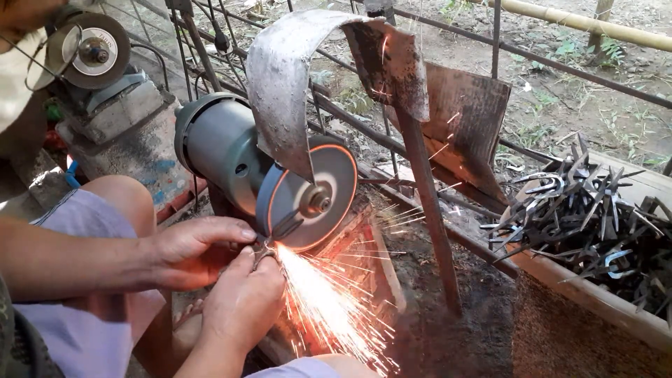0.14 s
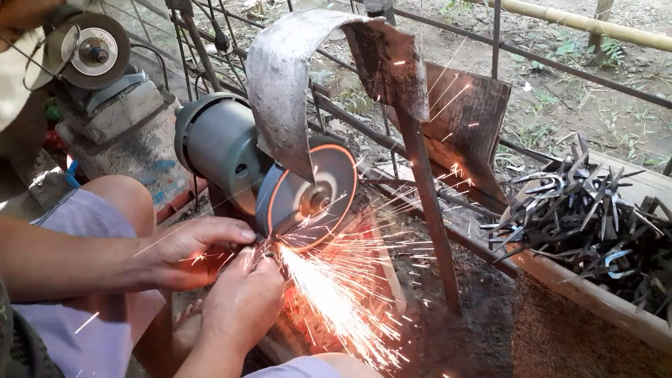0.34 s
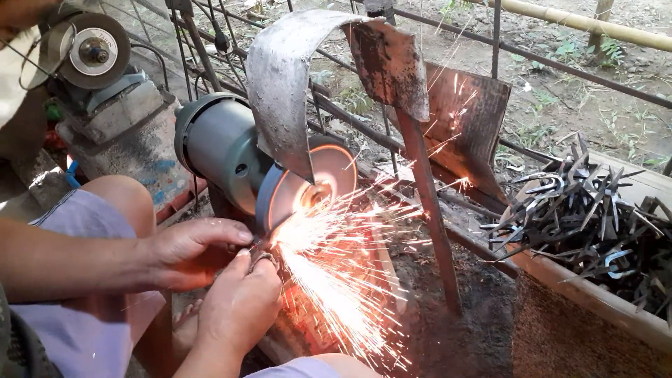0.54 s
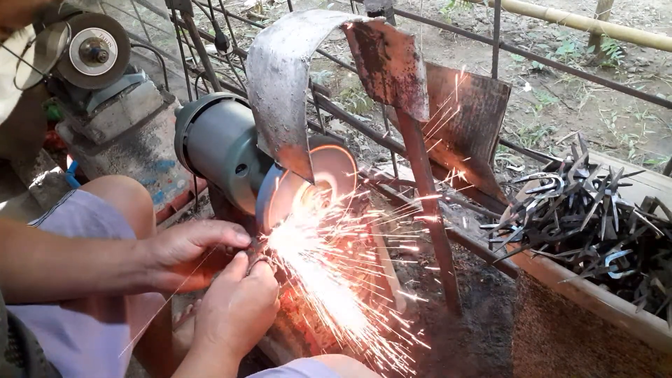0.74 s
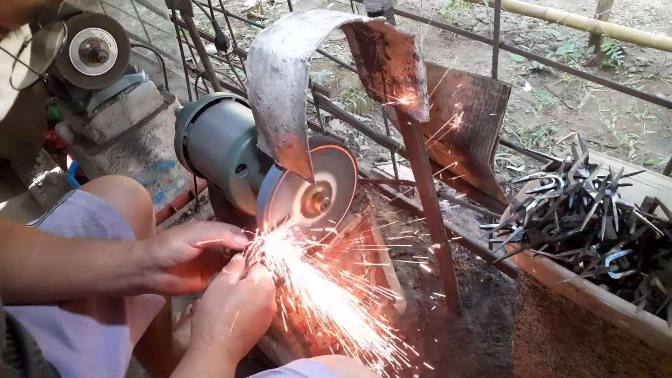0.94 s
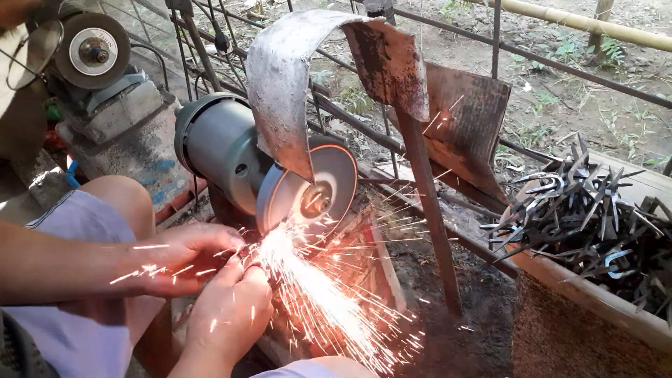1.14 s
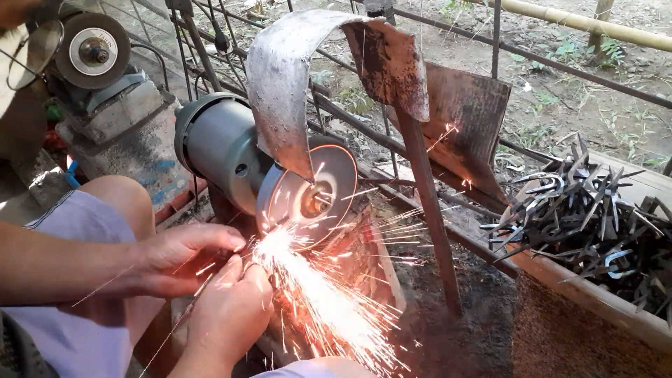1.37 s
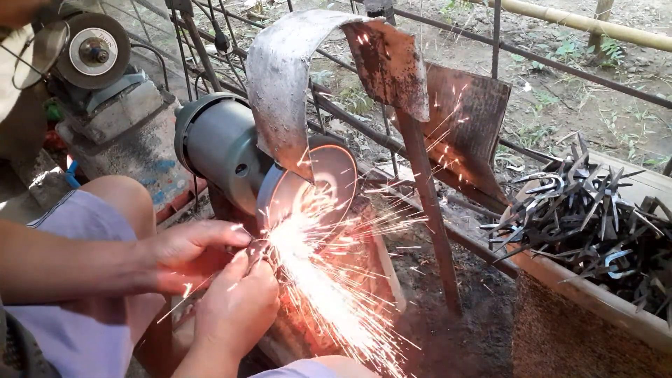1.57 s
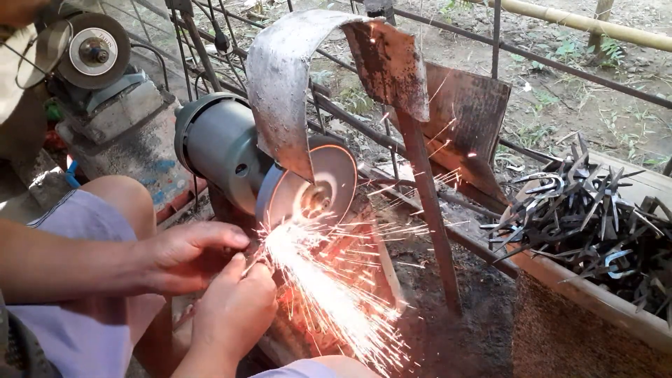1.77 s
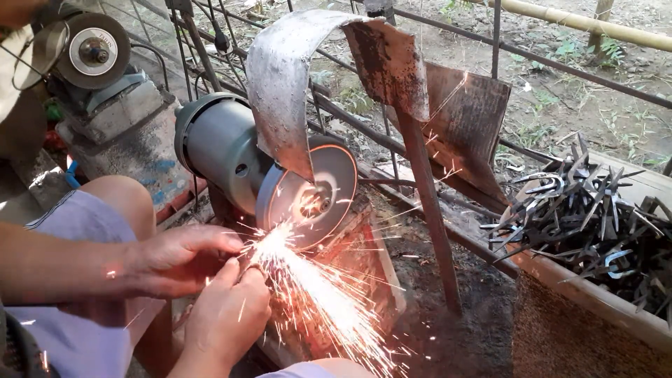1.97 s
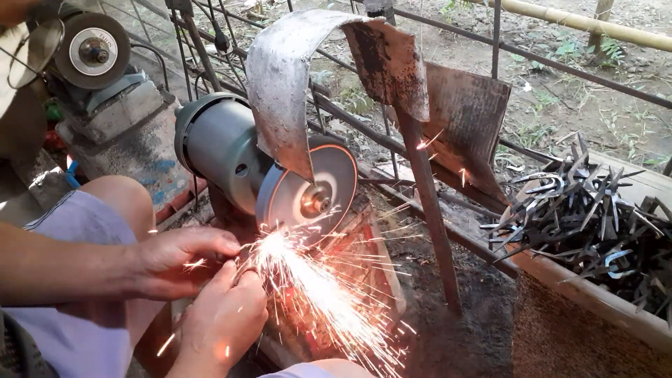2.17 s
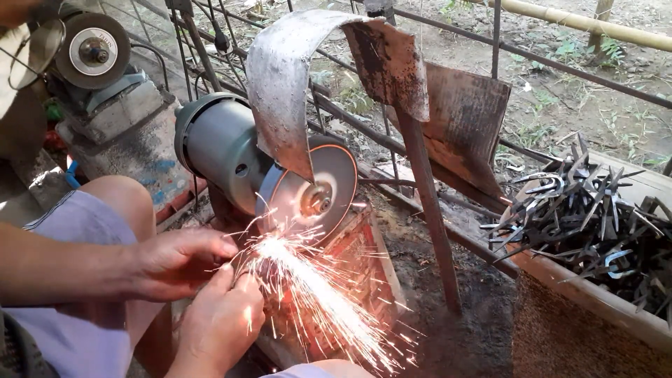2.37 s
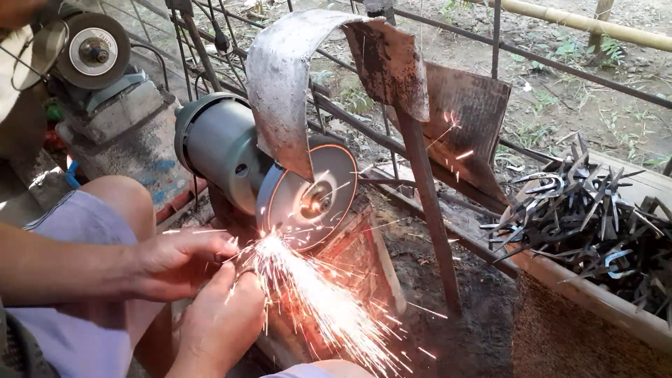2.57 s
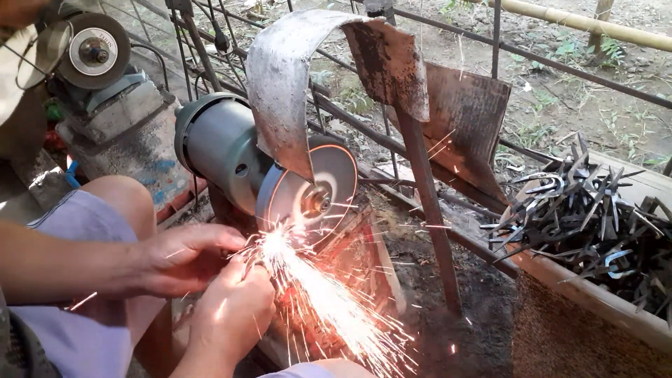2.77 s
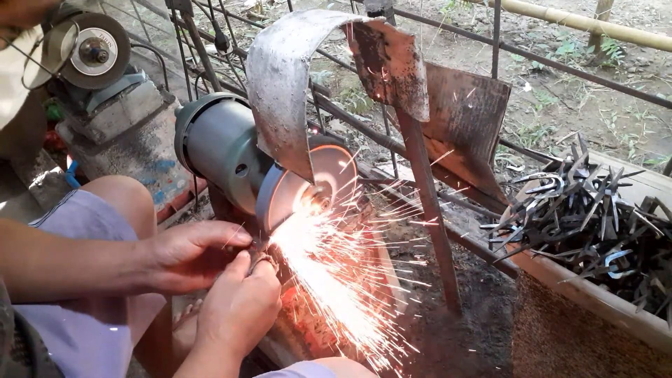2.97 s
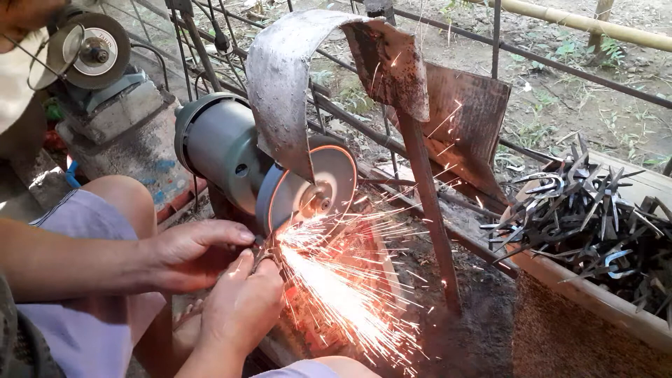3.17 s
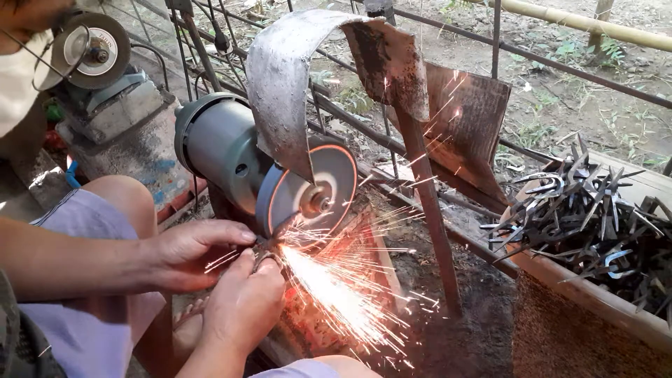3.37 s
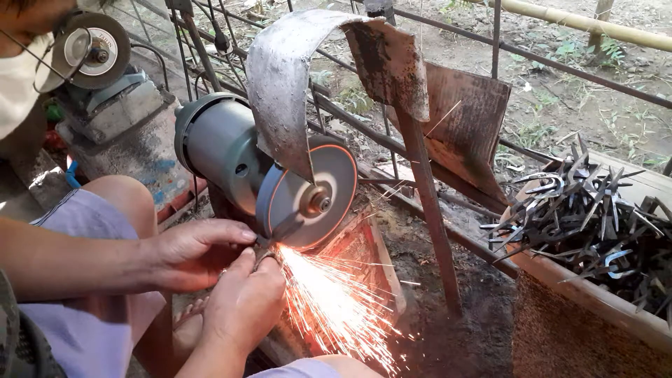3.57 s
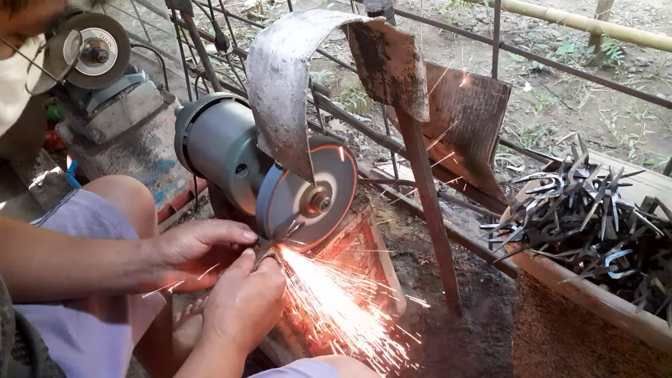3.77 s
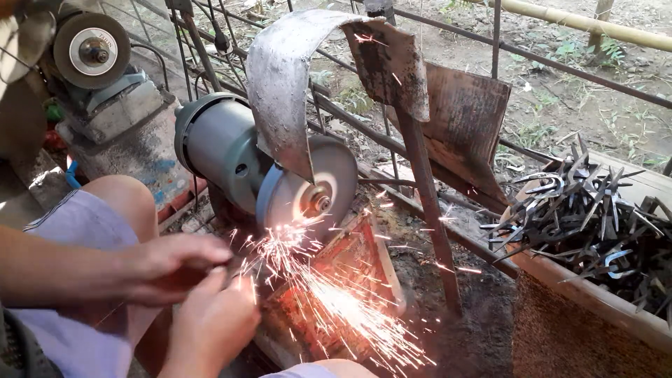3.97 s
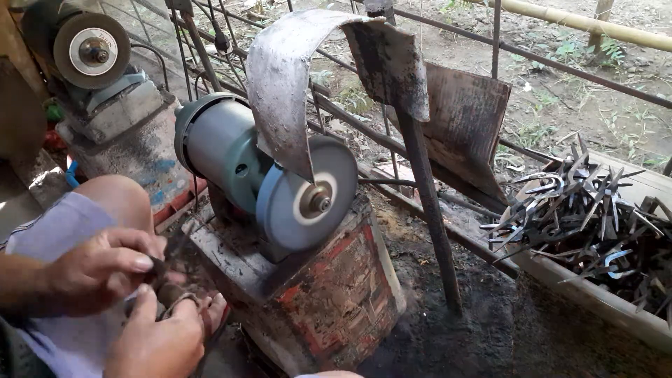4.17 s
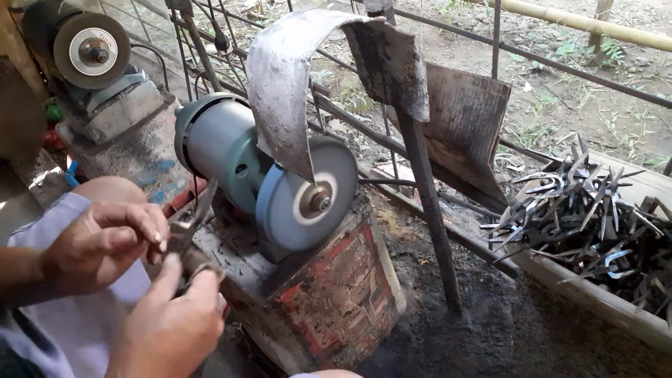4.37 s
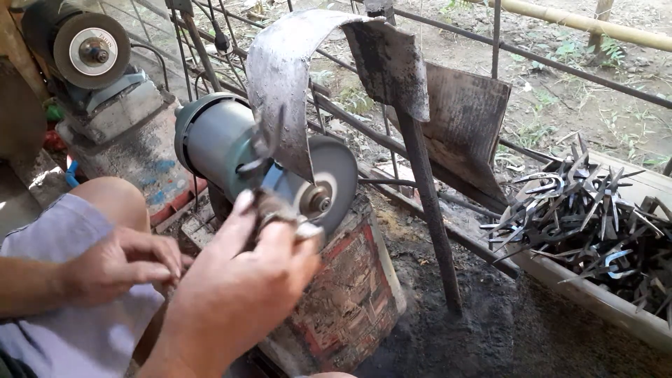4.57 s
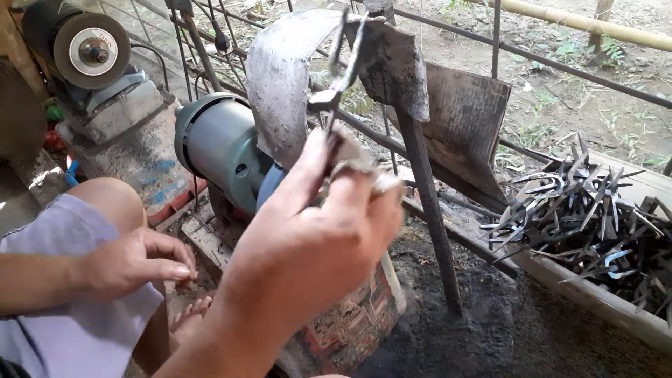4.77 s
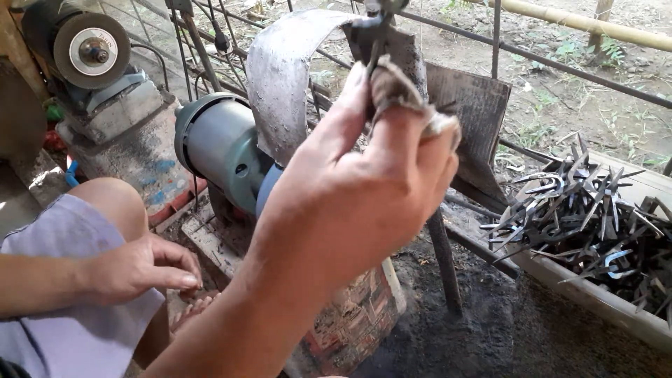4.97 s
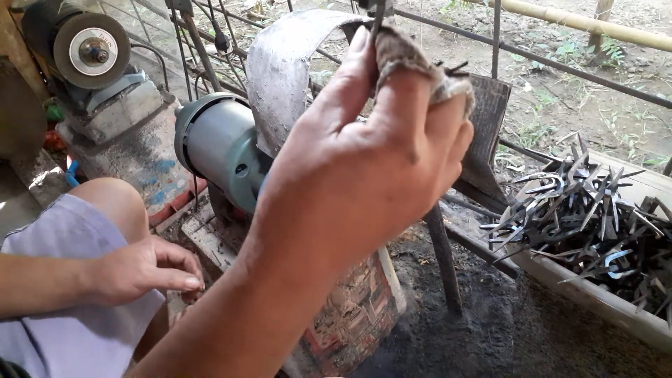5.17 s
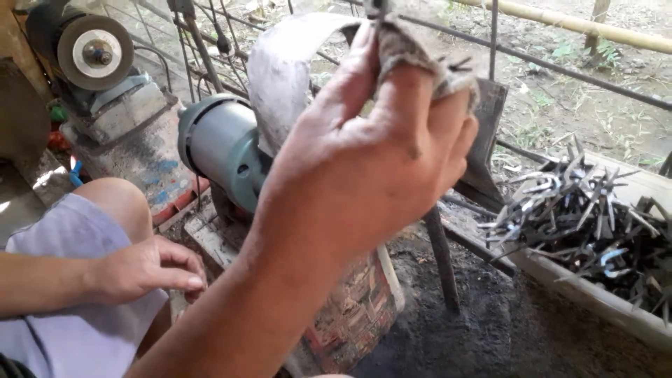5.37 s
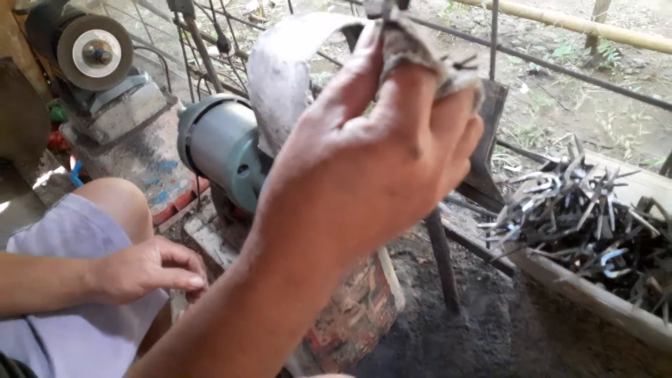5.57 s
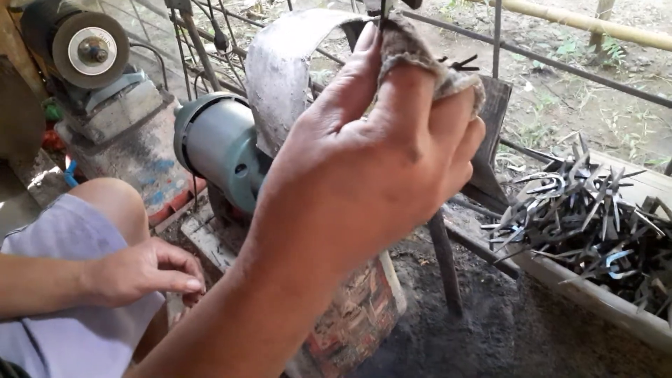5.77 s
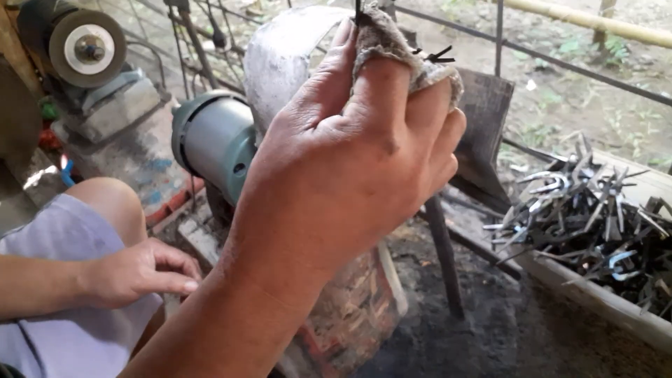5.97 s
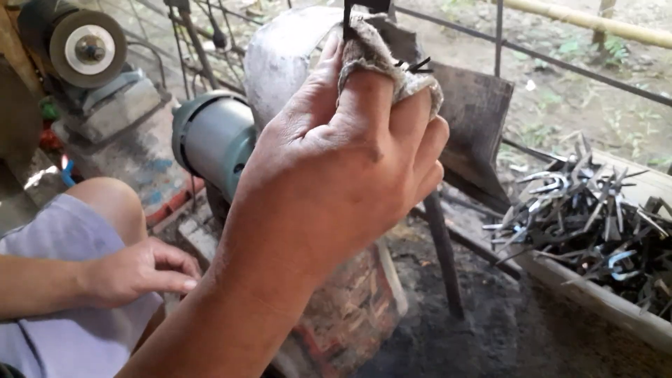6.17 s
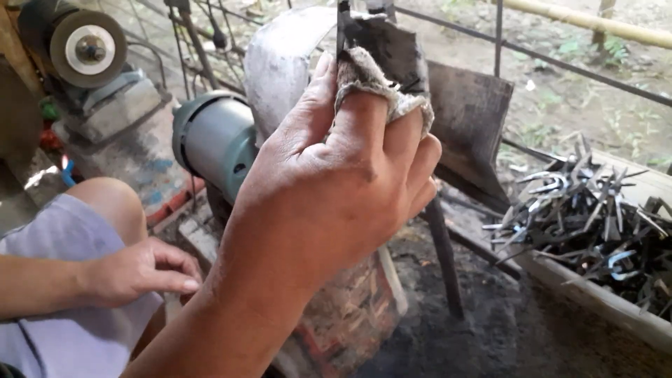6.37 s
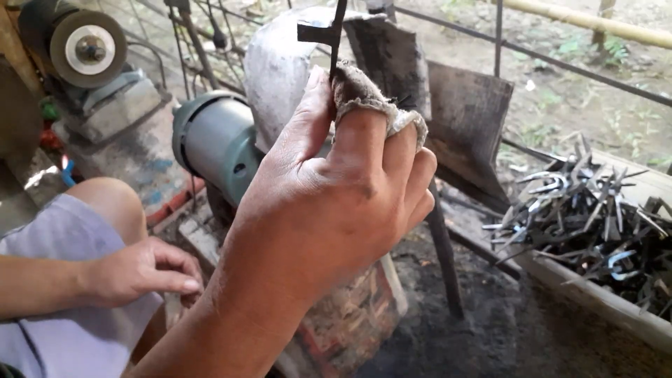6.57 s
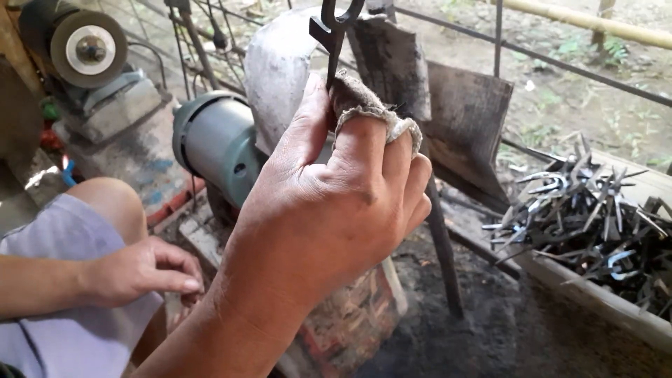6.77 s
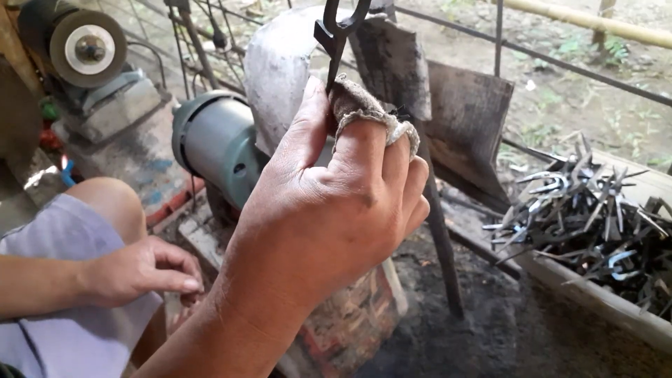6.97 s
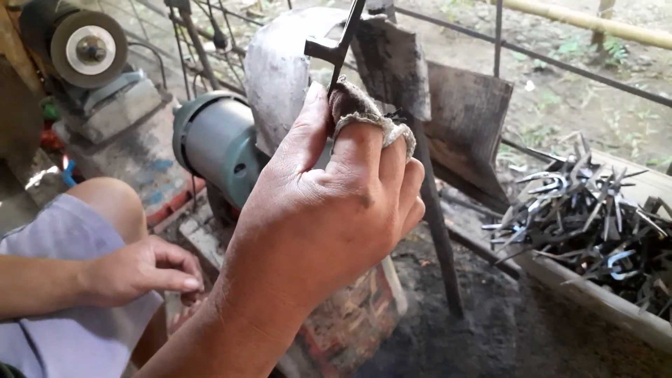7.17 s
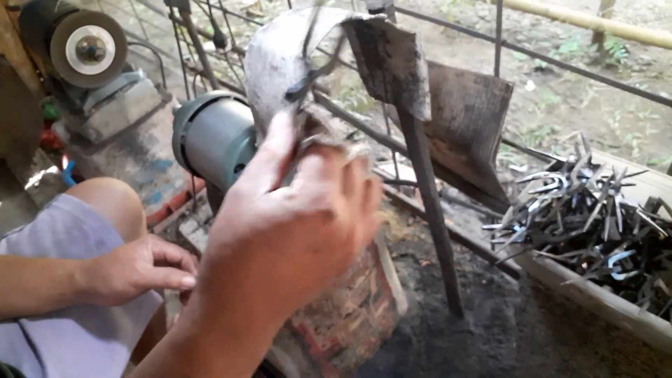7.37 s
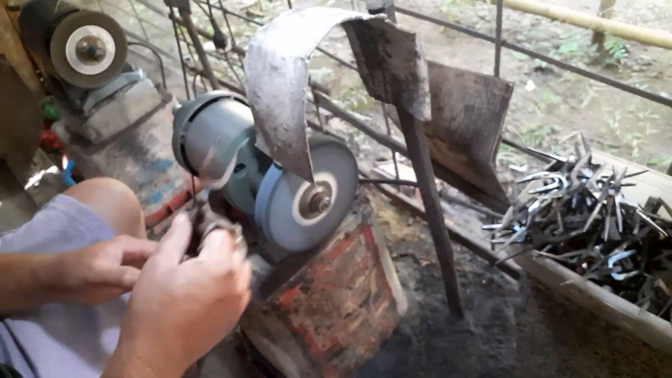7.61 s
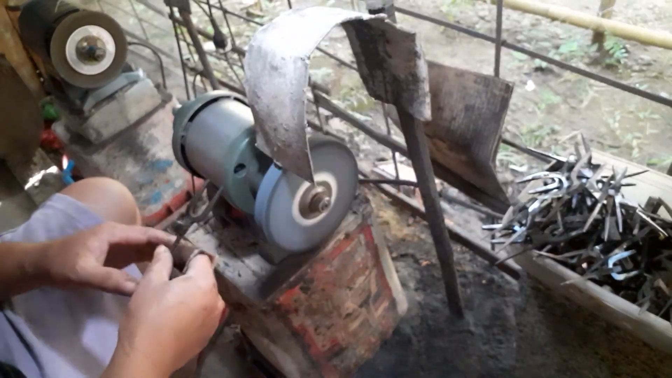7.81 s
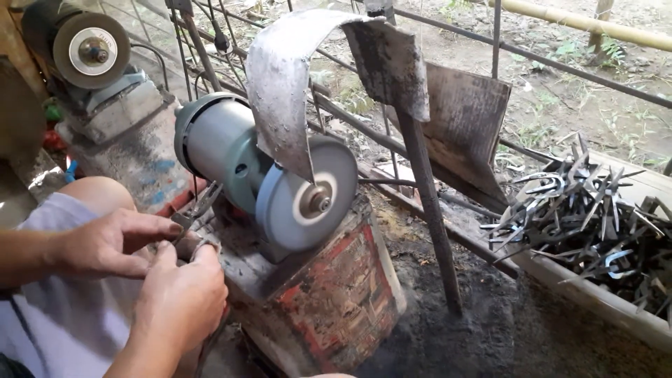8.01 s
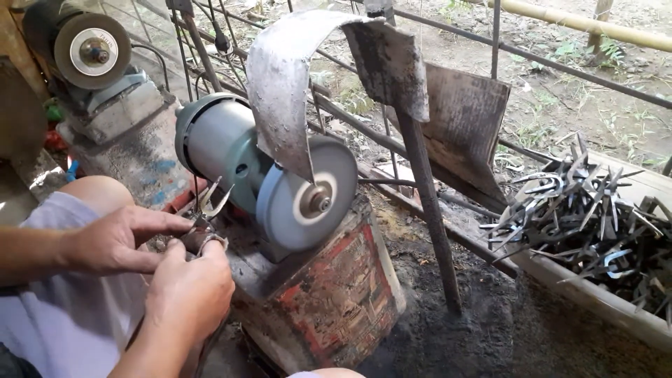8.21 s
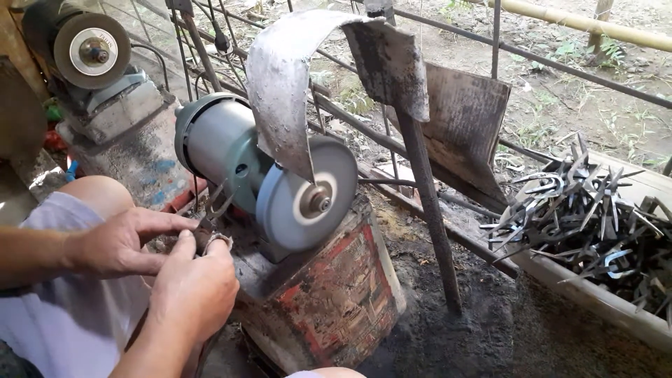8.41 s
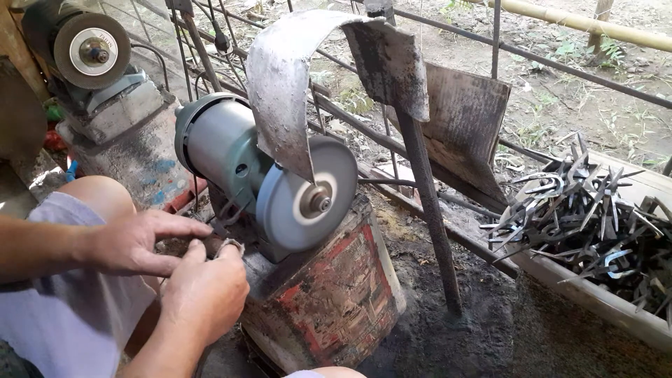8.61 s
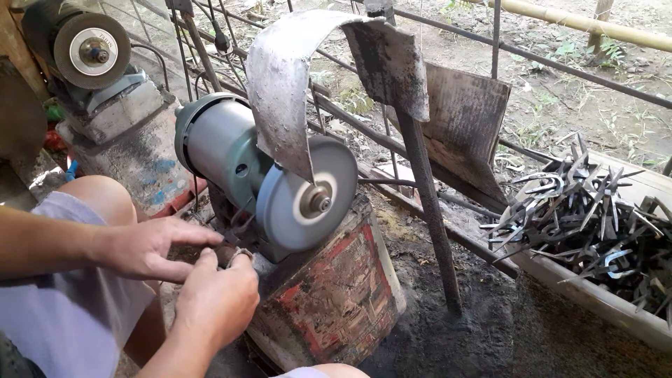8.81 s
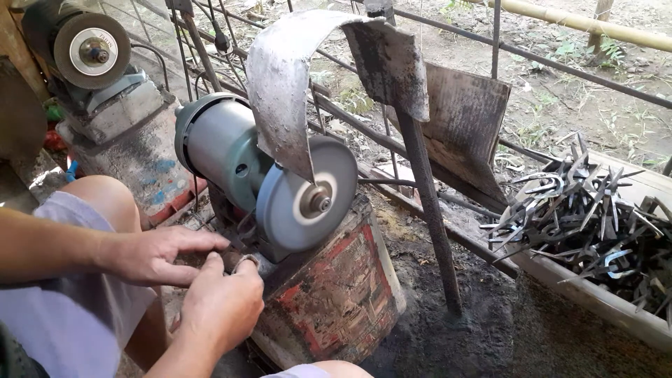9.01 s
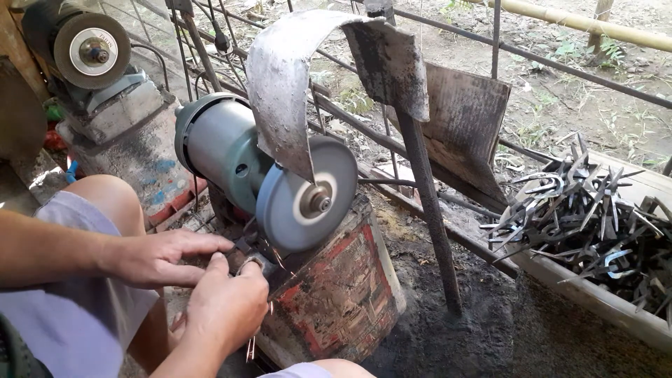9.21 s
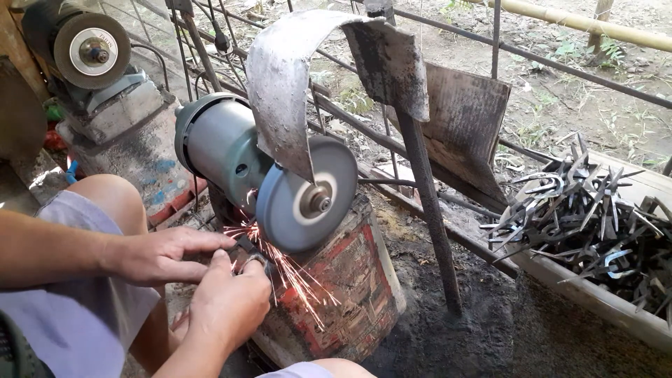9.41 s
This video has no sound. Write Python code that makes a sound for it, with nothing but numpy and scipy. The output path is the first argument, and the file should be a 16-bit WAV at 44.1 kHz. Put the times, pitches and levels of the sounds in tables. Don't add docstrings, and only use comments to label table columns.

```python
import sys
import numpy as np
from scipy import signal
from scipy.fft import rfft, irfft, next_fast_len
from scipy.io import wavfile
from scipy.ndimage import uniform_filter1d, map_coordinates

SR = 44100
rng = np.random.default_rng(int(sys.argv[2]) if len(sys.argv) > 2 else 0)


def put_to_file(sound):
    columns = np.atleast_2d(sound).T
    safe = np.clip(columns, -1, 1)
    whole_steps = np.round(safe * 32767)
    wavfile.write(sys.argv[1], SR, whole_steps.astype(np.int16))


def to_linear_factor(level_db):
    exponent = np.asarray(level_db, float) / 20
    return 10 ** exponent


N = 416743
TIME = np.arange(N) / SR
IDLE_HZ = 60.12
OFF_S = 4.04

# frequency in Hz, left minus right in dB.
IDLE_PAN = [(60, 5.5), (150, 3.5), (380, 6), (1500, -3), (2200, 4), (8300, 13), (10500, -12.5),
            (15000, 7.5)]


def level(x, db):
    return x * to_linear_factor(db) / np.sqrt(np.mean(x ** 2))


def curve(table):
    s, *columns = np.transpose(table)
    return [np.interp(TIME, s, c) for c in columns]


def walk(rate, db=None):
    held = np.repeat(rng.standard_normal(int(N / SR * rate) + 2), 4)
    knots = 1.2 * uniform_filter1d(held, size=4)
    knots = knots if db is None else to_linear_factor(db * knots)
    return np.interp(TIME * rate * 4, np.arange(len(knots)), knots)


def swells(rows):
    out = np.zeros(N)
    for s, length, strength in rows:
        span = slice(max(int((s - length / 2) * SR), 0), int((s + length / 2) * SR))
        out[span] += strength * np.cos(np.pi * (TIME[span] - s) / length) ** 2
    return out


def on_log(table, hz):
    f, v = np.transpose(table)
    return np.interp(np.log(hz + 1), np.log(f + 1), v)


def colour(x, spectrum, low_hz=0, high_hz=SR):
    size = next_fast_len(x.shape[-1])
    hz = np.fft.rfftfreq(size, 1 / SR)
    gain = to_linear_factor(on_log(spectrum, hz)) * (hz >= low_hz) * (hz < high_hz)
    return irfft(rfft(x, size) * gain, size)[..., :x.shape[-1]]


def ring(x, hz, width):
    return signal.lfilter(*signal.iirpeak(hz, hz / width, SR), x)


def rim(turns, kept, size=760):
    kept = np.clip(kept, 0, .99)
    fresh = rng.standard_normal((int(turns[-1]) + 2, size))
    worn = signal.lfilter([np.sqrt(1 - kept ** 2)], [1, -kept], fresh, axis=0)
    return map_coordinates(worn.ravel(), [turns * size], order=3)


def pair(phase, lead):
    phase = np.float32(phase % (2 * np.pi))
    return np.sqrt(2) * np.array([np.cos(phase), np.cos(phase - np.float32(lead))])


def ports(x, pan, phase=((1, 0),)):
    size = next_fast_len(x.shape[-1])
    hz = np.fft.rfftfreq(size, 1 / SR)
    side = to_linear_factor(on_log(pan, hz) / 2) * np.exp(.5j * on_log(phase, hz))
    both = np.array([side, 1 / side])
    both = both / np.maximum(np.abs(both.mean(axis=0)), .6)
    return irfft(rfft(x, size) * both, size)[:, :x.shape[-1]]


def hands():
    # time in seconds, pressure in dB, bracing against the rest from 0 to 1.
    stroke = [(0.0, 1, 0), (0.2, -1, 0), (0.38, -8.5, 0), (0.6, -1.5, 0.2), (0.9, 0, 0.2), (1.2, 0.5, 0.45),
              (1.5, -0.5, 0.06), (1.72, -4, 0.1), (1.87, 0.5, 0.18), (2.08, 2, 0.72), (2.35, 0, 0.96),
              (2.65, 0.5, 0.6), (2.9, -0.5, 0.15), (3.27, -7.5, 0), (3.55, 1.5, 0.05), (3.9, -1.5, 0.09)]
    # centre in seconds, length in seconds, strength from 0 to 1.
    leans = [
        (0.1, 0.32, 1),
        (2.46, 0.27, 1),
        (3.52, 0.47, 0.56),
        (3.75, 0.29, 0.89),
    ]
    # centre in seconds, length in seconds, strength from 0 to 1.
    flick = [
        (3.962, 0.067, 1),
    ]
    pressure, brace = curve(stroke)
    again = TIME > 6
    landing = 230 * np.minimum(TIME - 9.27, 0)
    lifting = -353 * np.maximum(TIME - 4.0, 0)
    fade = np.where(again, landing, lifting)
    fade = fade - 200 * ((TIME > OFF_S) & (TIME < 9.17))
    return np.where(again, 0, pressure), np.where(again, 0.65, brace), swells(leans), swells(flick), fade


def squeal():
    # centre in seconds, length in seconds, strength from 0 to 1.
    squeals = [(0.15, 0.6, 0), (0.65, 0.88, 0.23), (0.9, 0.31, 0.85), (1.62, 0.29, .25), (1.85, .25, 0.25),
               (2.95, .4, 0.1), (3.45, 0.28, 0.5), (9.33, 0.16, 0.27)]
    tone = np.cos(2 * np.pi * 2500 * TIME + 1.14 * walk(8.3)) * walk(18, db=-1.5)
    return tone * swells(squeals) * to_linear_factor(-25.5)


def wheel_bite(turns):
    # time in seconds, extra bite in dB.
    bounces = [(9.175, 1), (9.19, 1), (9.205, 21), (9.223, 10), (9.253, 13), (9.271, 15.5), (9.307, 9),
               (9.337, 11), (9.355, 3), (9.37, 13.5), (9.401, 1), (9.418, 5), (9.436, 8)]
    bite = 1.15 * np.cos(2 * np.pi * turns + 2.07 * walk(3))
    bite = bite - 5.3 * (TIME > 6)
    for s, db in bounces:
        start = int(s * SR)
        bite[start:] += db * np.exp(-TIME[:N - start] / 0.0036)
    return bite


def grinding(turns, hold):
    band_edges = (3700, 5600, 10200)
    grit_kept = (0.85, 0.7, 0.46, 0.074)
    # frequency in Hz, width in Hz, level in dB.
    blank_modes = [(1060, 260, -28), (1525, 80, -7), (1440, 100, -15), (1803, 23, -17), (2270, 30, -19),
                   (2650, 100, -18), (3180, 120, -25), (4170, 26, 5), (4100, 95, -9), (4300, 110, -17),
                   (4440, 20, -4), (5280, 68, -23), (5990, 190, -21), (8700, 250, -24), (9350, 47, -8),
                   (9670, 36, -3), (10500, 76, -22), (10800, 110, -20), (11000, 54, -16), (11300, 85, -17),
                   (12000, 82, -13), (15285, 42, -8), (15725, 27, -10)]
    # frequency in Hz, level in dB per Hz.
    scrape = [(700, -16), (1000, -15.5), (1300, 1), (2100, -2.5), (3000, -4.5), (3500, -6.5), (3900, 6),
              (4700, 5.5), (5600, -5.5), (7200, -9.5), (8800, -7.5), (10200, -4), (12400, 0.5), (13600, -9),
              (16000, 0)]
    band_trim = (-1.4, 0.51, -0.84, 0.78)
    # level in dB, dB per dB of pressure, dB when braced, dB at full lean,
    # dB at the flick, share of the fade on touching and leaving.
    bands = [
        (-27, .5, -11, -1.5, 0.5, 1.1),
        (-24.5, 1.4, -1.5, -5, 9.5, 1.23),
        (-28.5, 0.27, 0.5, 4, 5.5, 0.7),
        (-29.5, 1.9, -8.5, -2.5, 2, 0.37),
    ]
    # frequency in Hz, left minus right in dB.
    grind_pan = [(60, 5), (500, 31), (1300, -3), (2000, 13.5), (4600, 3.5), (8200, 27), (9700, -6.5),
                 (15000, -4.5)]
    # frequency in Hz, left lead in radians.
    grind_phase = [(0, 0), (1550, 0.2), (1890, -0.4), (2240, 0.7), (2760, -0.6), (4050, -12.6),
                   (5250, -13.3), (6120, -18.9), (8700, -18.6), (9220, -17.0), (9470, -18.4),
                   (12100, -18.8), (13200, -21.5), (16100, -24.8)]
    touch = (TIME < 4.3) | (TIME > 9.1)
    edges = (600, *band_edges, SR / 2)
    bite = wheel_bite(turns)
    near, spray = 0, 0
    sparks = rng.standard_normal((2, N))[:, touch]
    for k, (db, *slopes) in enumerate(bands):
        low, high = edges[k], edges[k + 1]
        band_db = db + sum(slope * c for slope, c in zip(slopes, hold))
        push = to_linear_factor((np.clip(band_db, -140, 0) + bite + 0.48 * walk(25))[touch])
        grit = push * rim(turns[touch], grit_kept[k])
        modes = [m for m in blank_modes if low <= m[0] < high]
        rings = 0
        for j, (hz, width, mode_db) in enumerate(modes):
            drive = grit * to_linear_factor(mode_db) * walk(3.98, db=0.66)[touch]
            rings = rings + (-1) ** j * ring(ring(drive, hz, width), hz, 6 * width)
        sound = rings + to_linear_factor(-33.0) * colour(grit, scrape, low, high)
        scale = to_linear_factor(band_trim[k]) * np.sqrt(np.mean(push ** 2) / np.mean(sound ** 2))
        near = near + scale * sound
        spray = spray + scale * push * colour(sparks, scrape, low, high)
    near = near + squeal()[touch]
    out = np.zeros((2, N))
    out[:, touch] = ports(near, grind_pan, grind_phase) + to_linear_factor(-21.5) * spray
    return out


def hum(turns):
    # frequency at idle in Hz, level in dB rms.
    multiples = [(59.2, -44), (120.2, -54), (177.6, -63), (236.9, -60), (301.5, -55), (360.7, -50),
                 (419.9, -63), (479.1, -51), (543.7, -59), (602.9, -61), (662.1, -65), (721.4, -66),
                 (780.6, -66), (899.0, -66), (963.6, -61), (1023, -69), (1082, -62), (1141, -66),
                 (1200, -64), (1260, -69), (1324, -73), (1384, -71), (1443, -65), (1502, -55), (1561, -64),
                 (1620, -66), (1685, -65), (1744, -69), (1803, -72)]
    # centre in seconds, length in seconds, relative
    guard_rings = [(4.72, 0.29, .3), (5.5, 0.88, 0.9), (6.2, 0.81, 0.68), (7.05, 0.69, 0.48),
                   (7.8, .9, 0.28), (8.65, 1, 1.1), (9.25, 0.51, 1)]
    total = 0
    guard = to_linear_factor(6.5) * (0.082 + swells(guard_rings))
    rattle = 0.95 * guard ** 0.38
    for hz, db in multiples:
        order = np.round(hz / IDLE_HZ)
        if abs(hz / IDLE_HZ - order) < .07:
            start, lead = rng.uniform(-np.pi, np.pi, size=2)
            if order >= 11:
                start, lead = .12 * start, 1.2 + .2 * lead
            sway = guard if order == 25 else walk(2.5, db=3.9 * min(order / 16, 1))
            sway = sway * rattle if order >= 11 and order != 25 else sway
            pan = to_linear_factor(db + on_log(IDLE_PAN, hz) * np.array([[.5], [-.5]]))
            phase = 2 * np.pi * order * turns + start
            total = total + pan * sway * pair(phase, min(order / 14, 1) * lead)
    return total


def bearings(turns):
    # frequency at idle in Hz, level in dB rms.
    bearing_tones = [(4963, -66), (5346, -68), (6002, -65), (8543, -54), (8592, -51), (8667, -63),
                     (8769, -60), (9135, -62), (10621, -63), (11919, -59), (12979, -66), (14820, -66),
                     (15132, -65), (15725, -69)]
    tones = 0
    for hz, db in bearing_tones:
        phase = 2 * np.pi * hz * turns / IDLE_HZ + 0.61 * walk(22)
        tones = tones + to_linear_factor(db) * walk(22, db=1.0) * pair(phase, rng.uniform(0, 2 * np.pi))
    return tones * to_linear_factor(np.array([[5], [-1]]))


def air_whirr(turns):
    # frequency in Hz, width in Hz, level in dB.
    casing_modes = [(4080, 11, -9), (5120, 24, -15.5), (5700, 36, -28), (6080, 110, -11), (7360, 120, -16),
                    (8723, 43, -4), (8870, 5, -26), (9430, 16, -1), (10700, 29, -20), (11950, 58, -4.5),
                    (13357, 130, -7), (14600, 47, -26), (15300, 96, -9.5), (15700, 26, -21)]
    # frequency in Hz, level in dB per Hz.
    whirr_spectrum = [(75, -6), (120, -11.5), (200, -19.5), (400, -22.5), (720, -23.5), (1500, -22),
                      (2400, -29), (4300, -26), (4600, -31.5), (4900, -25.5), (8000, -28.5), (8800, -24),
                      (13000, -24.5), (16000, -24)]
    air = [rim(turns, 0.47) for _ in range(3)]
    shared = colour(air[0], whirr_spectrum, low_hz=70.0, high_hz=900)
    air = np.array(air[1:])
    air = air + sum(to_linear_factor(db + 17.5) * ring(air, hz, width) for hz, width, db in casing_modes)
    own = colour(air, whirr_spectrum, low_hz=92)
    whirr = ports(shared + 0.94 * own, IDLE_PAN) * to_linear_factor(-40.5) / np.std(own)
    return whirr * walk(8.5, db=1.0)


def far_engine():
    # time in seconds, firing rate in Hz, level in dB.
    firing = [(0.0, 110.2, -57), (2.3, 108.1, -47), (4.2, 106.2, -51), (5.55, 102.1, -51.5),
              (5.9, 114.1, -51), (7.9, 110, -51), (8.2, 116.2, -51), (8.8, 113.7, -49), (9.45, 116, -49)]
    # multiple of the firing rate, level in dB.
    engine_orders = [(1, -2), (2, -13.5), (3, -12.5), (4, -44), (5, -9.5), (6, -13)]
    hz, db = curve(firing)
    phase = 2 * np.pi * np.cumsum(hz * (1 + 0.01514 * walk(12))) / SR
    note = sum(to_linear_factor(o_db) * walk(10, db=3.5) * np.cos(order * phase) for order, o_db in engine_orders)
    return np.sqrt(2) * note * to_linear_factor(db) * to_linear_factor(np.array([[2.5], [-3]]))


def rag():
    # frequency in Hz, level in dB per Hz.
    rag_spectrum = [(150, -16), (300, 3), (600, -16), (1500, -24), (4500, -16), (7000, -21), (9000, -26)]
    # centre in seconds, length in seconds, strength from 0 to 1.
    brushes = [
        (4.825, 0.26, 0.97),
    ]
    cloth = rng.standard_normal(N) * walk(29.77, db=4.0)
    return level(colour(cloth, rag_spectrum), -42) * swells(brushes)


def tool_rest(hold):
    # start in seconds, peak in dB, ring frequency in Hz, 60 dB decay time in seconds.
    knocks = [
        (2.63, -27, 105, 0.11),
        (3.99, -22.5, 298, 0.024),
        (4.013, -18, 132, 0.041),
        (4.014, -18, 900, 0.012),
        (4.016, -24, 3320, 0.024),
        (4.02, -38, 4300, .22),
        (4.02, -39, 4440, 0.35),
    ]
    _, brace, lean, *_ = hold
    shake = rng.standard_normal(N) * walk(29.77, db=4.0)
    rattle_db = -51.5 + 8.5 * brace + 10.5 * lean + 0.5 * walk(12)
    rattle = level(ring(ring(shake, 323, 180), 323, 180), 0) * to_linear_factor(rattle_db) * (TIME < OFF_S)
    t = TIME[:SR // 4]
    for s, db, hz, t60 in knocks:
        decay = np.exp(-np.log(1000) * t / t60)
        rattle[int(s * SR):][:len(t)] += to_linear_factor(db) * np.sin(2 * np.pi * hz * t) * decay
    return rattle


def shed(x, t60=0.11, wet_db=-4):
    t = np.arange(SR // 5) / SR
    tail = rng.standard_normal((2, len(t))) * np.exp(-np.log(1000) * t / t60)
    tail *= to_linear_factor(wet_db) / np.sqrt(np.sum(tail ** 2, axis=1, keepdims=True))
    return x + signal.fftconvolve(x.mean(axis=0, keepdims=True), tail, axes=1)[:, :N]


def scene():
    # time in seconds, turn rate in Hz.
    shaft = [(0.0, 58.4), (0.42, 57.93), (1.3, 58.68), (1.66, 57.77), (2.0, 58.84), (2.62, 59.18),
             (3.59, 57.36), (3.95, 59.1)]
    turns = np.cumsum(np.where(TIME < 4.03, curve(shaft)[0], IDLE_HZ)) / SR
    gain = to_linear_factor(-4.5 + 5.5 * np.clip((TIME - 5.24) / 0.7, 0, 1))
    hold = hands()
    rest = (tool_rest(hold) + rag()) * to_linear_factor(np.array([[3.5], [-5]]))
    machine = hum(turns) + bearings(turns) + air_whirr(turns)
    return shed(grinding(turns, hold) + rest) + gain * (machine + far_engine())


def roll_off(x):
    return signal.sosfilt(signal.butter(12, 16530, fs=SR, output="sos"), x)


def record(dry):
    low_cut = signal.butter(3, 40, "high", fs=SR, output="sos")
    top_cut = signal.ellip(10, .2, 45, 15760, fs=SR, output="sos")
    mix = signal.sosfilt(np.vstack([low_cut, top_cut]), dry)
    return roll_off(mix)


dry = scene()
out = record(dry)
put_to_file(out)
```